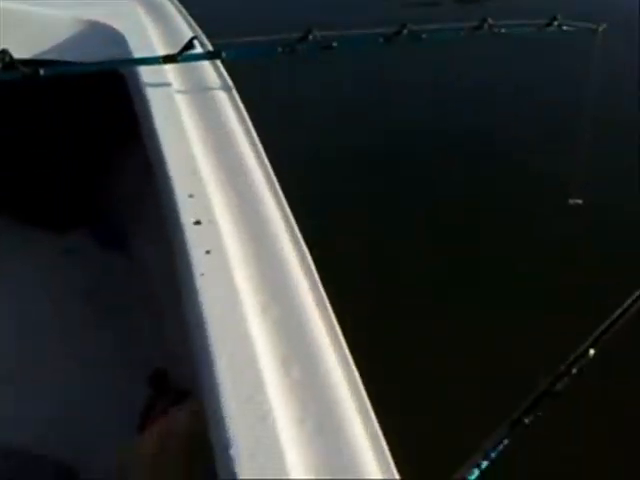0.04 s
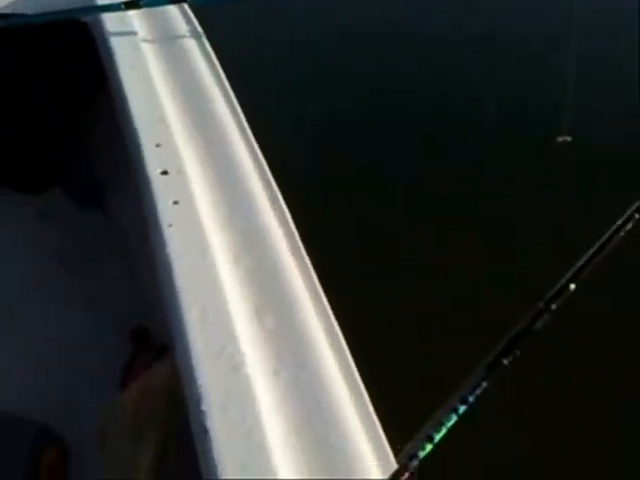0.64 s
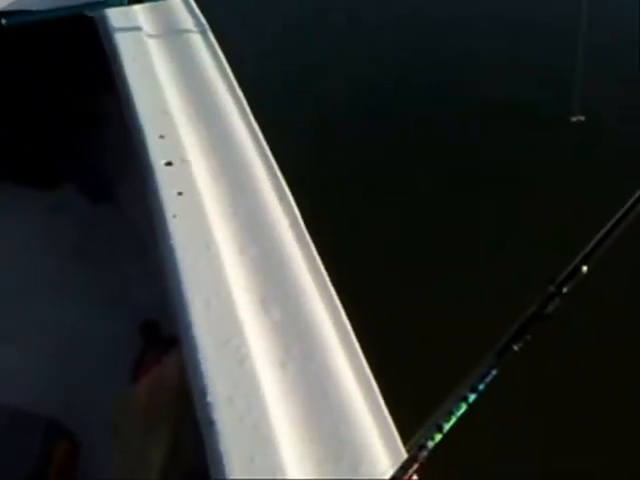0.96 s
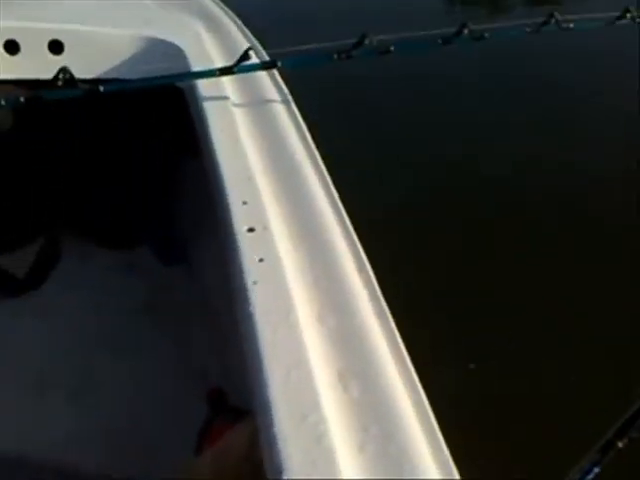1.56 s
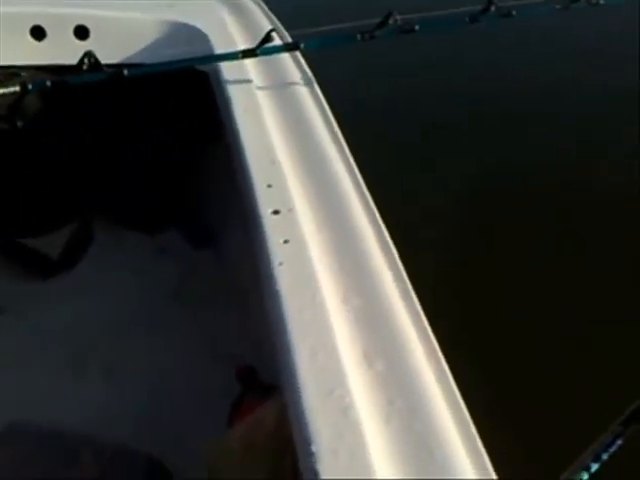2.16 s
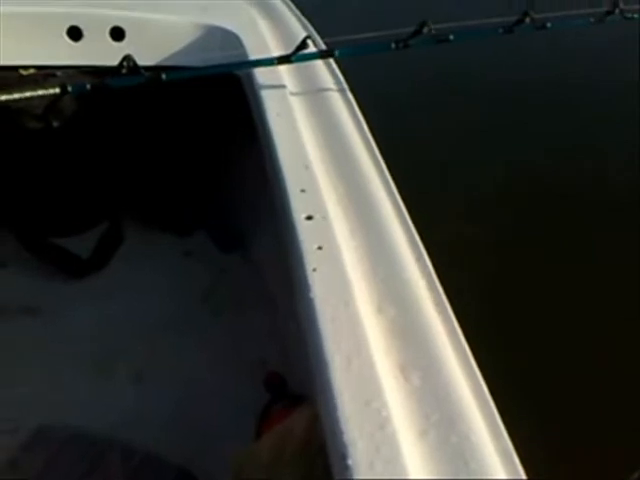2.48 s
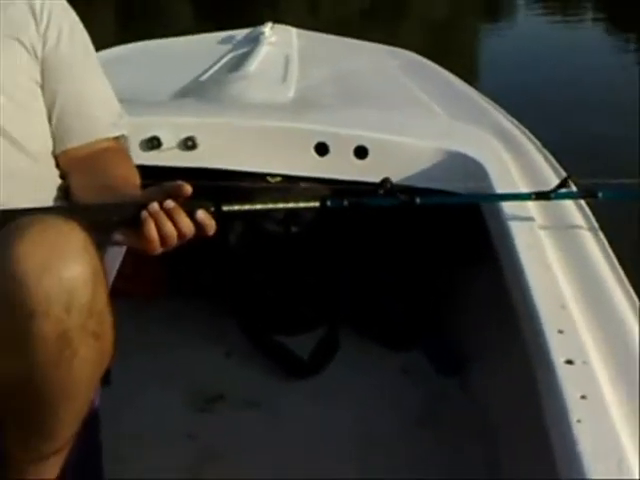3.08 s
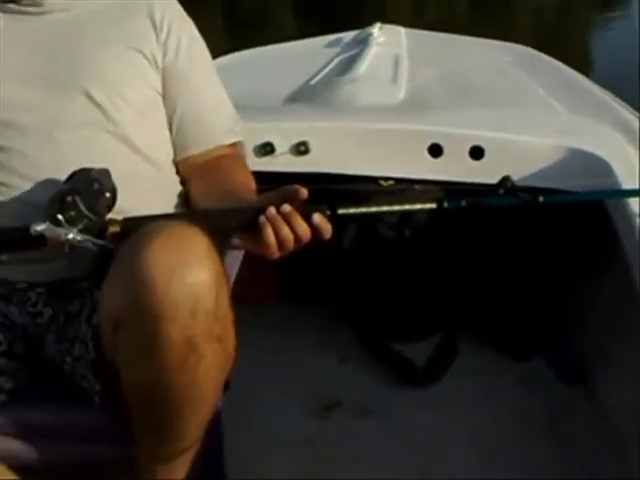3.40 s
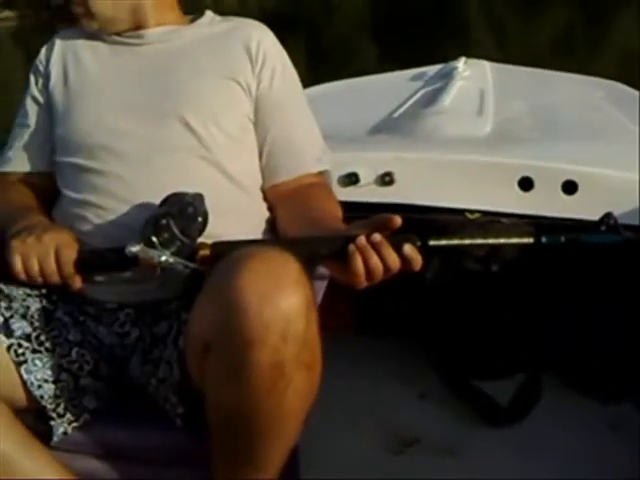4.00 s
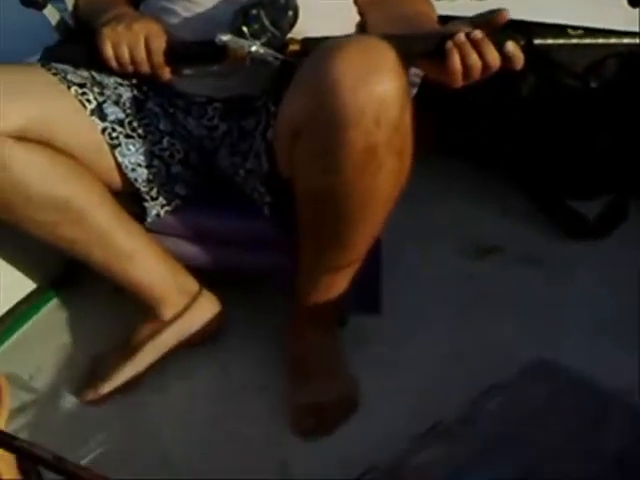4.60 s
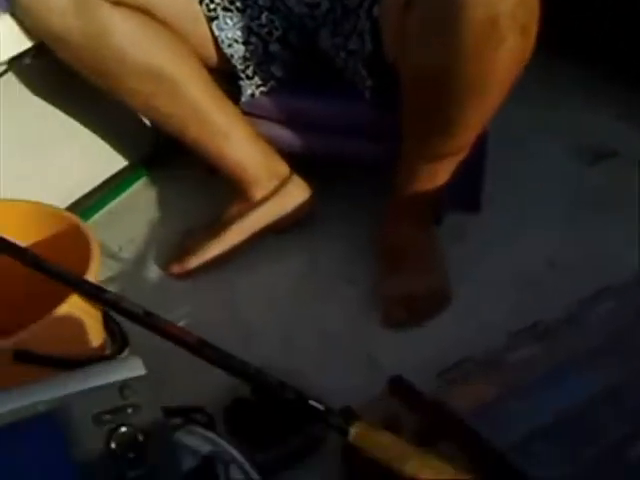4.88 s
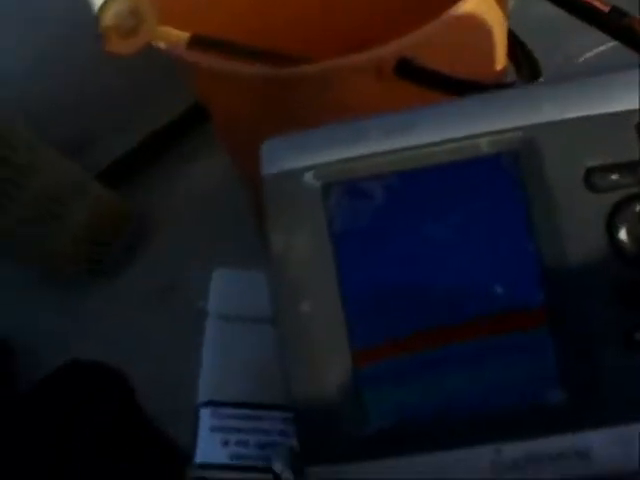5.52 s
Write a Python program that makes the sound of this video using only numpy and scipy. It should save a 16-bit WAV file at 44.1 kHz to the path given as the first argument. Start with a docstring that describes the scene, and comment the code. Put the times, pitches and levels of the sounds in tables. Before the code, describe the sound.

Low handling rumble and soft thumps in a small boat surround three loud, close strokes of a wooden clonk on river water. Each one slaps, plops with a hollow upward gulp and scatters drops, slightly distorting the microphone. The first two come about a second apart; the third follows a longer pause with light taps and a few faint, far bird chirps. One hard, briefly ringing knock in the boat comes last.

```python
"""A calm river, beside a small boat. A wooden catfish clonk is driven into the water three times:
a slap, the deep rising gulp of the air pocket, then spray and bubbles falling back.
A last, hard knock rings in the boat. Dull bumps, handling rumble and faint far birds lie underneath;
the close blows overload the microphone."""
import sys
import numpy as np
from scipy import signal
from scipy.fft import rfft, irfft, next_fast_len
from scipy.io import wavfile
from scipy.ndimage import uniform_filter1d, map_coordinates

SR = 44100
rng = np.random.default_rng(int(sys.argv[2]) if len(sys.argv) > 2 else 0)


def file_out(sig):
    """Save sig as 16-bit WAV at sys.argv[1]."""
    # one column per channel
    cols = np.atleast_2d(sig).T
    # limit, then scale
    lim = np.clip(cols, -1, 1)
    pcm = np.round(lim * 32767).astype(np.int16)
    wavfile.write(sys.argv[1], SR, pcm)


N = 249165

# clonk strokes: (time [s], slap [dB], slap rise [s], slap hold [s], pocket delay [s], gulp [dB],
# start pitch [Hz], end pitch [Hz], glide [s], gulp life [s], second gulp delay [s], second gulp [dB])
STROKES = [(0.998, 1, 0.0034, 0.017, 0.035, 15, 77.7, 338.4, .011, 0.03, 0.063, -16),
           (2.159, 7.5, 0.0036, 0.0072, .0105, 17, 46.5, 355.3, .023, 0.04, 0.071, -6.5),
           (4.661, -4, 0.0029, 0.013, .0115, 17.5, 69.9, 398.4, .02, 0.035, 0.057, 4)]
# handling rumble envelope: (time [s], level [dB])
HANDLING = [(0, -24.5), (.45, -26), (.65, -23.5), (1.1, -28), (1.4, -32.5), (1.7, -21.5), (2.05, -24),
            (2.3, -28.5), (2.8, -28.5), (3.2, -27), (3.5, -24.5), (3.85, -23.5), (4.55, -22), (4.9, -30),
            (5.15, -30.5), (5.33, -20.5), (5.65, -25.5)]


def amp(db):
    """Decibels to gain."""
    return 10 ** (np.asarray(db) / 20)


def unit(x):
    """Scale to rms 1."""
    return x / np.sqrt(np.mean(x ** 2) + 1e-20)


def seconds(size):
    """Time axis."""
    return np.arange(size) / SR


def add(track, at_s, sound):
    """Mix a sound into the track."""
    start = max(round(at_s * SR), 0)
    track[start:start + len(sound)] += sound[:max(len(track) - start, 0)]


def filtered(x, response):
    """Apply a gain given as a function of frequency."""
    size = next_fast_len(len(x) + 8192)
    return irfft(rfft(x, size) * response(np.fft.rfftfreq(size, 1 / SR)), size)[:len(x)]


def coloured(x, spectrum):
    """Shape by (frequency [Hz], gain [dB]) points; rms 1."""
    hz, db = np.transpose(spectrum)
    return unit(filtered(x, lambda f: amp(np.interp(np.log(f + 1), np.log(hz + 1), db))))


def noise(spectrum, size):
    """Coloured noise, rms 1."""
    return coloured(rng.standard_normal(size), spectrum)


def wobble(rate_hz, size=N):
    """Smooth random curve with knots at rate_hz."""
    t = seconds(size)
    coarse = t[::16]
    knots = rng.standard_normal(int(size * rate_hz / SR) + 4)
    return np.interp(t, coarse, map_coordinates(knots, [coarse * rate_hz]))


def patchy(x, depth_db):
    """Narrow bands swell and fade independently."""
    bands = signal.stft(x, nperseg=512)[2]
    field = rng.standard_normal(bands.shape)
    for _ in range(2):
        field = uniform_filter1d(uniform_filter1d(field, size=4, axis=0), size=14, axis=1)
    return unit(signal.istft(bands * amp(depth_db * unit(field)), nperseg=512)[1][:N])


def open_air(recovery_db_per_s=11.5):
    """Faint shifting air and soft hiss; both dip at each stroke and creep back."""
    # air and hiss spectra: (frequency [Hz], density [dB])
    air_spectrum = [(100, -26.5), (400, 0.5), (750, -3), (1300, -9), (2500, -13), (4000, -15), (6000, -25),
                    (16000, -35.5)]
    hiss_spectrum = [(500, -31), (2000, -6), (4300, -10), (6500, -7.5), (10000, -8), (15500, -8)]
    # background dips: (time [s], hiss gain [dB])
    dips = [(-.2, -19.5), (1.0, -20), (2.16, -20.5), (4.66, -13)]
    t, dip_db = seconds(N), np.zeros(N)
    for at_s, depth_db in dips:
        dip_db = np.where(t >= at_s, depth_db + recovery_db_per_s * (t - at_s), dip_db)
    air = amp(-45.5 + 0.51 * dip_db + 1.4 * wobble(27)) * patchy(noise(air_spectrum, N), depth_db=2)
    hiss = amp(-56 + dip_db + 0.6 * wobble(7.3)) * noise(hiss_spectrum, N)
    return air + hiss


def birds(blur=0.065, rasp_db=3, half_call_s=0.086):
    """Short calls from the far bank, pitch and level blurred by scattering."""
    # bird calls: (time [s], level [dB], pitch [Hz])
    calls = [(3.583, -51.5, 2750), (3.725, -47, 2880), (3.865, -43, 2370), (4.06, -46.5, 2320),
             (4.2, -47.5, 4230)]
    out, t = np.zeros(N), seconds(SR // 2) - 0.25
    for at_s, db, hz in calls:
        pitch_hz = hz * (1 + blur * wobble(400, len(t)))
        envelope = amp(db + rasp_db * wobble(120, len(t))) * np.exp(-2 * (t / half_call_s) ** 2)
        add(out, at_s + t[0], envelope * glide(pitch_hz))
    return out


def glide(hz):
    """Sine following a pitch curve."""
    return np.sin(2 * np.pi * np.cumsum(hz) / SR)


def handling_db(at_s):
    """Handling envelope at the given times."""
    return np.interp(at_s, *np.transpose(HANDLING))


def rumble():
    """Uneven low noise of handling."""
    # rumble spectrum: (frequency [Hz], density [dB])
    spectrum = [(12, -26.5), (20, -10.5), (43, 2), (72, 3.5), (167, -9), (225, -15.5), (299, -19),
                (375, -26), (451, -28.5), (600, -30), (780, -39), (1320, -120)]
    return amp(handling_db(seconds(N)) + 3.8 * wobble(12)) * noise(spectrum, N)


def nudges(per_s=3.5, over_rumble_db=7.5, spread_db=1.5, centre_hz=88):
    """Random lesser bumps that follow the handling level: (time [s], level [dB], pitch [Hz])."""
    when, size, pitch = rng.random((int(per_s * N / SR), 3)).T
    at_s = when * N / SR
    db = handling_db(at_s) + over_rumble_db + spread_db * (2 * size - 1)
    return list(zip(at_s, db, centre_hz * 2 ** (pitch - 0.5)))


def bumps(width_cycles=0.25, boom_hz=68, boom_db=-14, boom_t60_s=0.22, scuff_db=-19, scuff_s=0.012):
    """Soft handling bumps: one low swing with a dull scuff, then a short boom."""
    # strongest bumps: (time [s], level [dB], nominal pitch [Hz])
    strong_bumps = [(0.104, -9.5, 140), (0.376, -9.5, 132), (0.556, -7, 106), (0.599, -4, 110),
                    (0.752, -8, 115), (0.811, -5.5, 169), (0.88, -6, 117), (0.901, -5.5, 185),
                    (1.503, -7.5, 93), (1.641, -2.5, 164), (1.657, 5, 101), (1.677, -6.5, 84),
                    (1.707, -3, 146), (1.784, -2.5, 169), (1.803, -6, 109), (1.995, -4.5, 194),
                    (2.017, -8, 108), (2.056, -4, 104), (2.814, -18, 127), (2.966, -10.5, 189.7),
                    (3.953, 3.5, 62), (4.248, -6, 99), (5.422, -5, 80)]
    # scuff spectrum: (frequency [Hz], density [dB])
    scuff_spectrum = [(40, 0), (150, 6), (300, -2.5), (500, -17), (800, -30.5), (2000, -42.5),
                      (4000, -36.5), (6000, -46)]
    out, t = np.zeros(N), seconds(SR // 3) - 0.03
    age_s = np.maximum(t, 0)
    for at_s, db, hz in strong_bumps + nudges():
        swing = np.cos(2 * np.pi * hz * 0.97 * t) / np.cosh(hz * t / width_cycles)
        ring_hz = boom_hz * np.exp(rng.normal(0, 0.072))
        envelope = amp(boom_db - 60 * age_s / boom_t60_s) * (1 - np.exp(-age_s / 0.0031))
        boom = -np.sin(2 * np.pi * ring_hz * age_s) * envelope
        scuff = amp(scuff_db) * np.exp(-np.abs(t) / scuff_s) * noise(scuff_spectrum, len(t))
        add(out, at_s + t[0], amp(db) * (swing + boom + scuff))
    return out


def taps(t60_s=0.029):
    """Light, dull contacts in the boat."""
    # taps: (time [s], relative level [dB])
    contacts = [(0.307, -32), (0.382, -30.5), (3.696, -29), (3.872, -22.5), (3.897, -25.5), (3.99, -28.5),
                (4.016, -30.5), (5.204, -32)]
    # tap spectrum: (frequency [Hz], density [dB])
    spectrum = [(300, -20), (650, -5.5), (950, 1.5), (1300, -8), (2100, -9.5), (2700, -24.5), (6000, -30),
                (16000, -51.5)]
    out, t = np.zeros(N), seconds(SR // 10)
    for at_s, db in contacts:
        add(out, at_s, amp(db - 2 - 60 * t / t60_s) * noise(spectrum, len(t)))
    return out


def ticks(t60_s=0.015, tail_db=-22, tail_t60_s=0.09):
    """Short cracks, each with its own brightness."""
    # ticks and spatters: (time [s], relative level [dB], centre [Hz])
    cracks = [(0.041, -11, 1800), (0.0777, -6, 1570), (0.1835, -17, 1700), (0.8527, -14.5, 2400),
              (0.9327, -10, 4300), (1.1935, -10, 1600), (1.4768, -17, 3000), (2.0088, -1, 5600),
              (2.353, -17.5, 1700), (2.3916, -9, 1840), (2.4445, -16.5, 4320), (4.854, -10.5, 900),
              (4.978, -13.5, 1000)]
    out, t = np.zeros(N), seconds(SR // 8)
    envelope = amp(-60 * t / t60_s) + amp(tail_db - 60 * t / tail_t60_s)
    for at_s, db, hz in cracks:
        spectrum = [(hz / 4, -20), (hz * 0.55, -5), (hz, 0), (hz * 1.5, -6), (hz * 5, -20)]
        add(out, at_s, amp(db - 13) * envelope * noise(spectrum, len(t)))
    return out


def knock(at_s=5.5585, rebound_s=0.017, clatter_t60_s=0.16, crack_t60_s=0.074):
    """A hard blow in the boat and its rebound: bright crack, ringing modes, duller clatter."""
    # boat modes: (frequency [Hz], relative level [dB], t60 [s])
    modes = [(194.4, -12, 0.39), (233.6, -6, 0.15), (430, -16, 0.27), (625.4, -6, 0.2), (690, -6, 0.066),
             (827, -0.5, 0.17), (888.4, -2, 0.17), (1301, 3, 0.12), (1331, 1, 0.11), (1490, -1, 0.079),
             (1461, -9.5, .13), (2040, 1.5, 0.082), (2225, 1, 0.071), (2660, -21, 0.084), (3140, -9.5, .08),
             (4070, -20.5, 0.0584), (4900, -19.5, .06)]
    # clatter and crack spectra: (frequency [Hz], density [dB])
    clatter_spectrum = [(100, -6), (700, 4), (1500, -4.5), (2400, -6), (3500, -27), (6000, -38),
                        (16000, -47.5)]
    crack_spectrum = [(500, -18), (2000, 1), (4500, -2), (8000, -15), (16000, -17.5)]
    out, t = np.zeros(N), seconds(SR // 3)
    ring = sum(amp(db + 5 - 60 * t / t60_s) * np.sin(2 * np.pi * (hz * t + rng.random()))
               for hz, db, t60_s in modes)
    clatter = amp(4 - 60 * t / clatter_t60_s) * noise(clatter_spectrum, len(t))
    add(out, at_s, (ring + clatter) * (1 - np.exp(-t / 0.0026)))
    for hit_s in (at_s, at_s + rebound_s):
        add(out, hit_s, amp(-3 - 60 * t / crack_t60_s) * noise(crack_spectrum, len(t)))
    return out


def bubbles(t60_cycles=70, waver=0.041, climb_s=0.024):
    """Bubbles ring and glide unsteadily, faster near the surface; large ones ring longest."""
    # bubbles and drips: (time [s], relative level [dB], pitch [Hz], mean glide over climb_s [oct/s])
    rings = [(.043, -16, 1843, 6.5), (.056, -19.5, 3520, 16), (.235, -30.5, 758, 22), (.906, -27, 3900, -7),
             (1.195, -21.5, 448, 7), (1.425, -28.5, 904, 1.5), (1.508, -26.5, 442, 5.5),
             (2.4, -23, 476, 3.5), (2.466, -26.5, 734, 1), (2.49, -25.5, 565, 4), (4.854, -11.5, 1244, 20),
             (4.924, -25.5, 780, -4)]
    out, t = np.zeros(N), seconds(SR // 6)
    age_s = np.minimum(t, 0.07)  # the glide stops here
    attack = 1 - np.exp(-t / 0.00026)
    for at_s, db, hz, oct_per_s in rings:
        t60_s = t60_cycles / hz
        shake = wobble(152, len(t))
        octaves = oct_per_s * age_s * np.sqrt(age_s / climb_s)
        pitch_hz = hz * 2 ** octaves * (1 + waver * shake)
        add(out, at_s, amp(db + 4.5 + 2.2 * shake - 60 * t / t60_s) * attack * glide(pitch_hz))
    return out


def droplets(per_s, low_hz, high_hz, decay_cycles, spread_db):
    """Patter of tiny rising rings of very uneven size; rms 1."""
    t = seconds(SR // 80)
    when, pitch, size = rng.random((int(per_s * N / SR), 3)).T
    hz = low_hz * (high_hz / low_hz) ** pitch[:, None]
    gain = amp(-spread_db * np.log(1 - 0.98 * size))[:, None]
    rings = gain * np.sin(2 * np.pi * hz * t * (1 + 6 * t)) * np.exp(-t * hz / decay_cycles)
    index = (when[:, None] * N).astype(int) + np.arange(len(t))
    patter = np.bincount(index.ravel(), rings.ravel(), N)[:N]
    return unit(np.diff(patter, prepend=0))  # evens out long low rings and short high ones


def swell_db(at_s, hold_s=0, rise_db_per_s=901, sag_db_per_s=0, fade_db_per_s=150.5):
    """Envelope: rises to 0 dB at at_s, sags during the hold, then fades."""
    t = seconds(N) - at_s
    return (rise_db_per_s * np.minimum(t, 0) - sag_db_per_s * np.clip(t, 0, hold_s)
            - fade_db_per_s * np.maximum(t - hold_s, 0))


def spray_envelope(mist_delay_s=0.066):
    """Each stroke swishes in and throws up mist; the water falls back as a shower."""
    # splash of each stroke: (swish lead [s], swish [dB], mist [dB])
    splashes = [(0.054, -32.5, -21.5), (0.027, -30, -24.5), (0.0073, -28.5, -30.5)]
    # thrown water raining back: (time [s], level [dB], hold [s])
    showers = [(0.013, -26, .19), (1.14, -25, 0.27), (2.354, -28.5, 0.17), (4.852, -28, .115)]
    swells = []
    for (at_s, *_), (lead_s, swish_db, mist_db) in zip(STROKES, splashes):
        swells.append(swish_db + swell_db(at_s - lead_s, lead_s, rise_db_per_s=437, fade_db_per_s=437))
        swells.append(mist_db + swell_db(at_s + mist_delay_s, fade_db_per_s=113))
    for at_s, db, hold_s in showers:
        swells.append(db - 3 + swell_db(at_s, rise_db_per_s=120))  # a few drops land early
        swells.append(db + swell_db(at_s, hold_s, sag_db_per_s=26.5))
    return amp(np.max(swells, axis=0))


def spray(foam_gain=0.69, plop_db=-11, crackle_db=-13, impacts_per_s=350, clump_db=2.3):
    """Fine drops and larger plops over a wash of foam and the crackle of their impacts."""
    # drop and crackle spectra: (frequency [Hz], gain [dB])
    drop_spectrum = [(240, -14), (400, 2), (600, -2), (950, -9.5), (1300, -8), (2000, -6.5), (2600, -12),
                     (4700, -15), (6600, -28), (15500, -29.5)]
    crackle_spectrum = [(900, -30), (2200, -7.5), (4500, 4), (8000, -10.5), (15500, -15.5)]
    fine = droplets(per_s=1800, low_hz=795, high_hz=9030, decay_cycles=5.7, spread_db=5)
    plops = droplets(per_s=260, low_hz=550, high_hz=2600, decay_cycles=7, spread_db=4.5)
    foam = foam_gain * rng.standard_normal(N)
    water = coloured(fine + amp(plop_db) * plops + foam, drop_spectrum)
    impacts = (rng.random(N) < impacts_per_s / SR) * rng.standard_normal(N)
    decay = np.exp(-seconds(SR // 100) / 0.003)
    sputter = signal.fftconvolve(np.abs(impacts), decay)[:N] * rng.standard_normal(N)
    water += amp(crackle_db) * coloured(sputter, crackle_spectrum)
    return spray_envelope() * amp(clump_db * wobble(45)) * water


def clonk(slap_t60_s=0.081, foam_db=-30, foam_t60_s=0.35, swell_s=0.0065, churn_db=-19):
    """The head slaps the surface and drags down an air pocket, whose pitch climbs as it closes."""
    # churn spectrum: (frequency [Hz], density [dB])
    churn_spectrum = [(80, -22.5), (250, 0), (340, 0), (450, -9), (900, -18.5), (4000, -41)]
    # slap spectrum: (frequency [Hz], density [dB])
    slap_spectrum = [(100, 4.5), (350, 4.5), (1100, -4.5), (1800, 4), (3700, -9.5), (6000, -17),
                     (10000, -23.5), (16000, -25.5)]
    out, t = np.zeros(N), seconds(SR // 2)
    for (at_s, slap_db, rise_s, hold_s, delay_s, gulp_db,
         start_hz, end_hz, glide_s, life_s, second_s, second_db) in STROKES:
        # the slap holds while the head cuts the surface, then dies into foam
        entry = (1 - np.exp(-(t / rise_s) ** 2)) * amp(-60 * np.maximum(t - hold_s, 0) / slap_t60_s)
        foam = amp(foam_db - 60 * t / foam_t60_s)
        add(out, at_s, (amp(slap_db) * entry + foam) * noise(slap_spectrum, len(t)))
        # the pocket booms, climbs and collapses abruptly
        pocket_s = at_s + delay_s
        pitch_hz = end_hz + (start_hz - end_hz) * np.exp(-(t / glide_s) ** 1.4)
        pitch_hz *= 1 + 0.073 * wobble(186.3, len(t))  # wall shudder
        envelope = (1 - np.exp(-t / swell_s)) * np.exp(-(t / life_s) ** 2.43)
        add(out, pocket_s, amp(gulp_db) * envelope * glide(pitch_hz))
        # its remainder gulps once more, briefly and lower
        age = t / 0.0043
        pulse = amp(second_db) * age * np.exp((1 - age ** 2) / 2)
        add(out, pocket_s + second_s, pulse * np.sin(2 * np.pi * 0.86 * end_hz * t))
        # smaller pockets churn near the same pitch
        churn = (1 - np.exp(-t / 0.0037)) * noise(churn_spectrum, len(t))
        add(out, pocket_s, amp(gulp_db + churn_db - 60 * t / 0.27) * churn)
    return out


def scene():
    """All sources at one close microphone, in the open."""
    water = clonk() + spray() + bubbles()
    boat = ticks() + taps() + bumps() + knock()
    return (water + boat + birds() + rumble() + open_air())[None]


def record(dry, ceiling=0.96, band_limit_hz=15750):
    """The input overloads into flat tops, then is band-limited."""
    x = dry[0]
    clipped = x / (1 + np.abs(x / ceiling) ** 10) ** (1 / 10)
    return filtered(clipped, lambda hz: hz < band_limit_hz)[None]


dry = scene()
out = record(dry)
file_out(out)
```